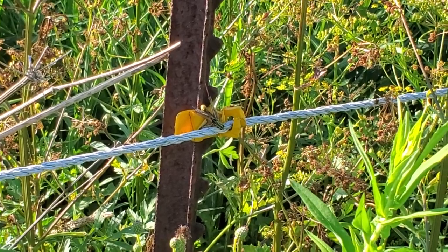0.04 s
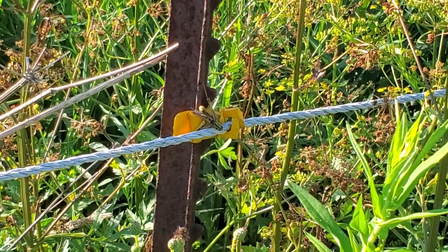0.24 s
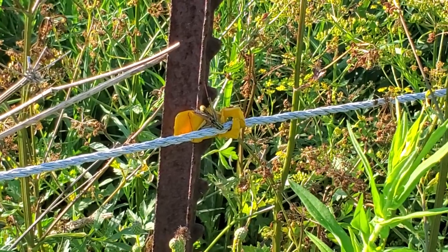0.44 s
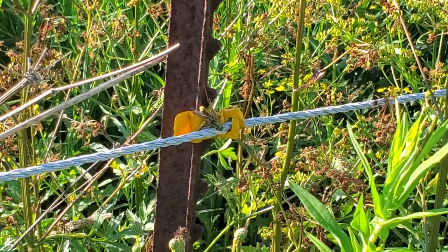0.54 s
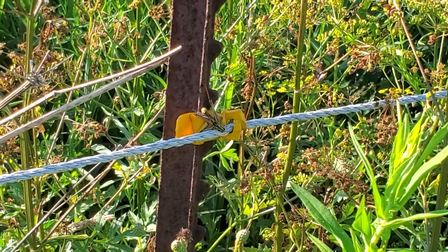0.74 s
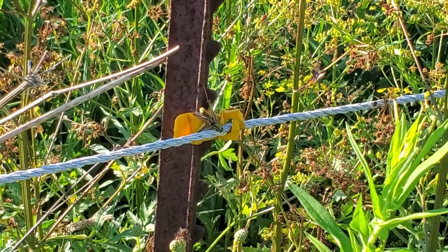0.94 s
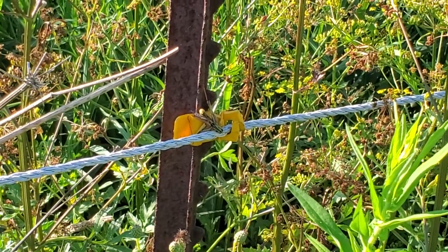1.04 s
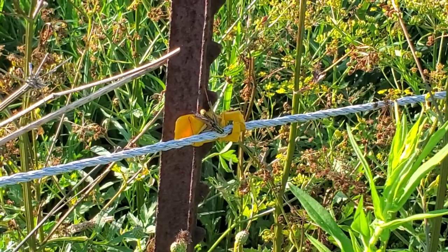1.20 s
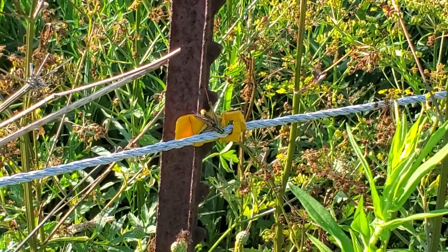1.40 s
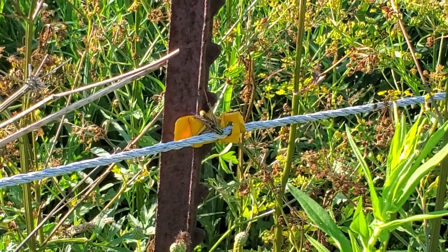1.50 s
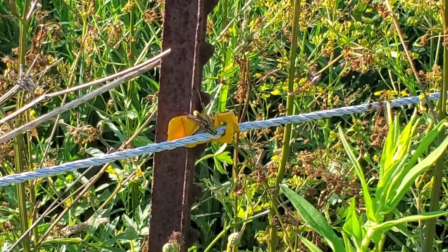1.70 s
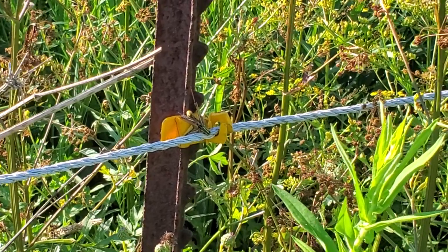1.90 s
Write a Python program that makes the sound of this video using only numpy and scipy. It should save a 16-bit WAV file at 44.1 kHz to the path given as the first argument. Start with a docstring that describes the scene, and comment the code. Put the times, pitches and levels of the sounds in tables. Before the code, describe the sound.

Two sharp electric fence clicks sound about a second apart outdoors. Faint bird chirps come first, then two short, ticking insect buzzes beside the right microphone just before the second click. A light gust stirs the grass at the end.

```python
"""A distant wash, hissing grass and light wind on the microphones sound throughout. A small bird chirps
and twitters, and a farther one whistles. Among the first notes an electric fence arcs to a steel post:
a hard snap, then a short scatter from tall weeds. An insect buzzes twice beside the right microphone,
its wings ticking against something. As the second buzz ends the fence arcs again; last, a few puffs
strike the left microphone and the grass swells in a gust."""
import sys
import numpy as np
from scipy import signal
from scipy.fft import rfft, irfft
from scipy.io import wavfile

SR = 44100
rng = np.random.default_rng(int(sys.argv[2]) if len(sys.argv) > 2 else 0)


def wav_out(sig):
    """Save sig, one row per channel (or a flat mono array), as 16-bit PCM at SR to the path in sys.argv[1]."""
    wavfile.write(sys.argv[1], SR, np.round(np.clip(np.atleast_2d(sig).T, -1, 1) * 32767).astype(np.int16))


N = 85995
T = np.arange(N) / SR
AIR_TOP_HZ, CUTOFF_HZ = 15900, 17100


def from_db(db):
    """Amplitude ratio: tenfold for every 20 dB."""
    return 10 ** (np.asarray(db) / 20)


def rms_one(x):
    """Normalisation to a root mean square of 1."""
    return x / np.sqrt(np.mean(x ** 2) + 1e-20)


def in_time(rows):
    """Linear interpolation at every sample of rows that begin with a time in seconds."""
    s, *columns = np.transpose(rows)
    return [np.interp(T, s, c) for c in columns]


def pan(db):
    """Constant-power panning: two gains, the left db above the right."""
    return rms_one(from_db([[db / 2], [-db / 2]]))


def drift(hz):
    """Random fluctuation of rms 1: noise through a two-pole low-pass."""
    r = np.exp(-2 * np.pi * hz / SR)
    return rms_one(signal.lfilter([1], [1, -2 * r, r * r], rng.standard_normal(2 * N))[N:])


def gains(spectrum, hz):
    """Magnitude response through (Hz, dB) points, falling 12 dB an octave beyond its ends."""
    f, db = np.transpose(spectrum)
    hz = np.maximum(hz, 1)
    skirts = np.minimum(1, np.minimum(hz / f[0], f[-1] / hz)) ** 2
    return from_db(np.interp(np.log(hz), np.log(f), db)) * skirts


def noise(spectrum, correlation=0, top_hz=AIR_TOP_HZ):
    """Coloured stereo noise of rms 1; a shared part correlates the channels."""
    hz = np.arange(N + 1) * SR / (2 * N)
    left, right, shared = rng.standard_normal((3, 2 * N))
    white = np.sqrt(1 - correlation) * np.array([left, right]) + np.sqrt(correlation) * shared
    return rms_one(irfft(rfft(white) * gains(spectrum, hz) * (hz < top_hz))[:, :N])


def decay(start, t60):
    """Exponential decay from start, by 60 dB in t60 seconds."""
    return (T >= start) * from_db(-60 * np.clip((T - start) / t60, 0, 10))


def bumps(rows):
    """A sum of Gaussian envelopes."""
    return sum(from_db(db) * np.exp(-np.minimum(((T - s) / width) ** 2, 50)) for s, width, db in rows)


def phase_of(hz):
    """Phase in radians, the integral of frequency."""
    return 2 * np.pi * np.cumsum(hz) / SR


def distant_wash():
    """Stationary noise from far off, with little treble."""
    # Each row: frequency in Hz, level in dB.
    spectrum = [(120, -5), (190, -6.5), (280, -4.5), (400, -8), (620, -4), (1050, -4.5), (1290, -13.5),
                (1700, -15), (2170, -32), (3000, -29.5)]
    return from_db(-66.5) * pan(-3) * noise(spectrum, correlation=.5)


def grass():
    """A broadband hiss that slowly rises, dips after the second snap, then swells in a closing gust."""
    # Each row: frequency in Hz, level in dB.
    hiss_spectrum = [(1500, 3), (2600, -8), (4000, -1.5), (5200, -7), (6700, 3), (8000, -13.5), (9600, -9),
                     (12000, 0.5), (15500, -8)]
    gust_spectrum = [(800, 2.5), (1500, -2.5), (2700, 1.5), (4500, -2), (6700, 1.5), (8100, -13.5),
                     (9600, -8.5), (12500, -3), (15500, -1.5)]
    # Each row: time in seconds, level in dB.
    hiss_level = [(0, -74), (.3, -72), (.55, -69.5), (.8, -68.5), (1.0, -67), (1.2, -67), (1.4, -67.5),
                  (1.55, -71.5), (1.95, -59)]
    gust_level = [(0, -100), (1.58, -90.5), (1.7, -67.5), (1.8, -57), (1.88, -52.5), (1.95, -53.5)]
    hiss = from_db(in_time(hiss_level)[0] + .7 * drift(40)) * noise(hiss_spectrum, correlation=.15)
    gust = from_db(in_time(gust_level)[0] + .8 * drift(51)) * noise(gust_spectrum, correlation=.15)
    return pan(-3.5) * hiss + pan(-4.5) * gust


def microphone_wind():
    """Turbulent pressure on the microphones: a rumble, and low puffs on the left."""
    # Each row: frequency in Hz, level in dB.
    spectrum = [(20, -23.5), (40, -9), (65, 2), (95, -1), (140, -21.5), (250, -28)]
    # Each row: time in seconds, level in dB.
    level = [(0, -71), (.2, -76), (.4, -68), (1.1, -65), (1.4, -69.5), (1.95, -60.5)]
    # Each row: centre in seconds, half-width in seconds, level in dB.
    puffs = [(1.51, .015, -55), (1.632, 0.012, -52), (1.67, 0.012, -43)]
    rumble = from_db(in_time(level)[0] + drift(6)) * noise(spectrum, correlation=.4)
    eddy_hz = 58 * (1 + .14 * drift(60))
    return rumble + pan(20) * bumps(puffs) * np.sin(phase_of(eddy_hz))


def birds():
    """Frequency-modulated tones: rising chirps, thin twitters and a farther bird's falling whistle."""
    # Each row: start and length in seconds, first and last pitch in Hz, level in dB.
    chirps = [(.010, 0.068, 3930, 4970, -54), (0.219, 0.061, 4190, 4870, -54),
              (0.426, .066, 4087, 4830, -54), (0.644, 0.059, 3853, 4730, -57)]
    # Each row: start and length in seconds, first, middle and last pitch in Hz, level in dB.
    twitters = [(0.122, 0.0067, 4850, 5400, 6650, -63), (0.131, 0.0063, 6700, 5900, 5030, -62),
                (0.141, 0.011, 6600, 5500, 4500, -54.5), (0.332, 0.0066, 7300, 6300, 5240, -65.5),
                (.339, 0.0062, 7100, 5950, 4950, -61.5), (0.346, 0.006, 6700, 5550, 4430, -57.5),
                (0.353, .008, 6090, 5100, 4100, -56.5), (0.366, .019, 4200, 5970, 6270, -62),
                (0.382, .011, 6500, 5460, 2630, -57.5), (0.547, 0.01, 4900, 5760, 6960, -64.5),
                (.556, 0.0067, 6840, 5560, 4600, -62), (0.564, 0.0063, 6320, 5400, 4560, -61.5),
                (0.576, 0.014, 5360, 4590, 4200, -59.5), (0.589, 0.02, 4550, 6040, 3860, -64.5)]
    whistles = [(.168, .095, 3150, 2780, 2520, -67), (.265, .065, 2550, 2455, 2400, -75)]
    rasp_depth_hz, rasp_rate_hz, waver_hz = 250, 300, 58.5
    song = np.zeros(N)
    for start, length, first_hz, last_hz, db in chirps:
        u = np.clip((T - start) / length, 0, 1)
        rasp = rasp_depth_hz * np.sin(2 * np.pi * rasp_rate_hz * T) + waver_hz * drift(300)
        hz = first_hz + (last_hz - first_hz) * u ** 2 + (1 - u ** 2) * rasp  # starts raspy, ends pure
        swell = np.minimum(2 * u, 1) * np.minimum((1 - u) / .15, 1)
        song += from_db(db) * swell * np.sin(phase_of(hz))
    for start, length, *pitches, db in twitters + whistles:
        u = np.clip((T - start) / length, 0, 1)
        arch_hz = np.polyval(np.polyfit([0, .5, 1], pitches, 2), u)
        hz = arch_hz * (1 + .068 * drift(500))
        swell = np.sqrt(np.abs(np.sin(np.pi * u)))
        song += from_db(db) * swell * np.sin(phase_of(hz))
    leaves = from_db(-2.5) * echoes(song, t60=.032)
    field = from_db(-8.5) * echoes(song, t60=.69)
    return pan(-10.5) * (song + leaves + field)


def echoes(x, t60):
    """Diffuse reflection: convolution with decaying noise of unit energy, different in each ear."""
    response = rms_one(rng.standard_normal((2, N)) * decay(0, t60)) / np.sqrt(N)
    return signal.fftconvolve(response, x[None], axes=1)[:, :N]


def causal_pulse(spectrum, size=2048):
    """Minimum phase: folding the cepstrum gives the most compact one-sided pulse of a spectrum."""
    cepstrum = irfft(np.log(gains(spectrum, np.linspace(0, SR / 2, size + 1)) + 1e-3))
    cepstrum[1:size] *= 2
    cepstrum[size + 1:] = 0
    return irfft(np.exp(rfft(cepstrum)))


def snap(start, db, treble_db, treble_hz):
    """An arc's pressure pulse arrives directly, then as a duller near reflection."""
    # Each row: frequency in Hz, left and right level in dB.
    spectrum = [(300, -28.5, -28.5), (700, -21, -24), (1150, -13, -9.5), (2160, -11.5, -19), (3470, -1, -1),
                (4725, 10, 9.5), (7010, 10, 21), (7480, 3, 12.5), (9200, -8.5, -2), (12250, -4.5, -2.5),
                (15800, -3, 6.5)]
    hz, *ears = np.transpose(spectrum)
    right_lag_s, smear_hz, smear_width_hz = .00006, 5870, 5600
    r = np.exp(-np.pi * smear_width_hz / SR)
    poles = np.array([1, -2 * r * np.cos(2 * np.pi * smear_hz / SR), r * r])
    out = np.zeros((2, N))
    for ear, colour in enumerate(ears):
        echo_s = .002 * rng.uniform(.82, 1.05)
        for delay, path_db, path_treble_db in ((0, 0, 0), (echo_s, -12, -9)):
            levels = colour + db + path_db + (treble_db + path_treble_db) * (hz > treble_hz)
            pulse = causal_pulse(np.transpose([hz, levels]))
            pulse = signal.lfilter(poles[::-1], poles, pulse)  # all-pass dispersion
            i = int((start + delay) * SR) + ear * round(right_lag_s * SR)
            out[ear, i:i + len(pulse)] += pulse
    return out


def fence_arcs():
    """Impulse response: each snap scatters off the weeds and leaves a brief high ring and a far tail."""
    # Each row: start in seconds, snap level, treble boost and scatter level in dB,
    # scatter T60 in seconds, tail level in dB.
    arcs = [(0.1504, 0.5, -3.5, -26, 0.047, -53.5), (1.3166, -3.5, 1.5, -28, 0.07, -49.5)]
    # Each row: frequency in Hz, level in dB.
    weed_spectrum = [(400, -47), (1000, -13.5), (1750, -15.5), (2300, -10.5), (3400, -2.5), (5000, -3.5),
                     (6700, 4.5), (8200, -4), (10000, -0.5), (15500, -2.5)]
    tail_spectrum = [(800, -6.5), (2000, -7), (3500, 2), (6700, 3), (8200, -3.5), (12000, -3.5),
                     (15500, -6)]
    # Each row: frequency in Hz, level in dB, T60 in seconds.
    ring_modes = [(4930, -44, .07), (6580, -41.5, .07), (8860, -50.5, 0.025), (11700, -43, .07),
                  (13100, -73.5, .07)]
    treble_hz, scatter_rise_s = 8500, .00089
    out = np.zeros((2, N))
    for start, db, treble_db, scatter_db, scatter_t60, tail_db in arcs:
        age = T - start
        out += snap(start, db, treble_db, treble_hz)
        colour = [(hz, level + treble_db * (hz > treble_hz)) for hz, level in weed_spectrum]
        envelope = decay(start, scatter_t60) * np.clip(age / scatter_rise_s, 0, 1)
        scatter = from_db(scatter_db) * envelope * noise(colour, correlation=.22)
        ring = sum(from_db(level) * decay(start, t60) * np.sin(2 * np.pi * hz * age)
                   for hz, level, t60 in ring_modes)
        tail = from_db(tail_db) * decay(start, t60=.3) * noise(tail_spectrum)
        out += pan(-2) * (scatter + ring) + pan(-2.5) * tail
    return out


def insect():
    """Periodic wingbeats radiate harmonics, stir the air and rasp; the wings tick where they touch."""
    # One list a buzz. Each row: time in seconds, wingbeat rate in Hz, level in dB.
    buzzes = [
        [(.915, 143, -84), (.945, 146, -52), (.968, 141, -47), (1.022, 145, -52), (1.066, 140, -45),
         (1.108, 137, -49), (1.128, 136, -65.5)],
        [(1.262, 142, -72), (1.287, 142, -48), (1.303, 146, -50.5), (1.322, 147, -67.5)],
    ]
    # Each entry: a harmonic's level in dB, from the fundamental up.
    harmonics = [0, -6, -19, -13, -17, -20, -24, -25]
    # Each row: frequency in Hz, level in dB.
    rasp_spectrum = [(500, -9.5), (2000, -26), (4200, -22), (5500, -7.5), (6800, 7), (8500, -8),
                     (11000, 0.5), (14500, 1), (16500, -8.5)]
    draught_spectrum = [(110, -5), (220, 1.5), (400, -2), (700, -5.5), (1200, -16), (2500, -16),
                        (4500, -18), (8000, -31)]
    # Each row: start in seconds, level in dB, decay time in seconds.
    ticks = [(0.932, -47, 0.0012), (1.057, -51.5, 0.0016), (1.0638, -38, .0014), (1.0675, -31, .001),
             (1.072, -31, 0.0024), (1.076, -46, .0008), (1.096, -41, 0.002), (1.1022, -47, 0.00055),
             (1.1038, -40, 0.00084), (1.1118, -36.5, 0.0011), (1.2682, -51.5, .003), (1.2763, -47, 0.0017),
             (1.2776, -38, 0.0014), (1.2783, -44, 0.001), (1.2851, -36, 0.0015), (1.2869, -47, 0.00092)]
    # The wings brush past. Each row: centre in seconds, half-width in seconds, level in dB.
    stirs = [(1.068, 0.0056, -58.5), (1.103, 0.02, -51.5), (1.289, 0.02, -62)]
    jitter, flutter_db = .024, 1.2
    rasp = noise(rasp_spectrum, top_hz=CUTOFF_HZ)[0]
    draught = noise(draught_spectrum)[0]
    wings = bumps(stirs) * draught
    for buzz in buzzes:
        hz, db = in_time(buzz)
        level = from_db(db) * (T > buzz[0][0]) * (T < buzz[-1][0])
        phase = phase_of(hz * (1 + jitter * drift(58.2)))
        tone = sum(from_db(harmonic_db + flutter_db * drift(28) * (k > 0)) * np.cos((k + 1) * phase)
                   for k, harmonic_db in enumerate(harmonics))
        strokes = from_db(-18.5 + 2 * drift(40)) * rms_one(np.exp(np.cos(phase)))  # one swell a beat
        wings += level * (from_db(-17.5) * draught + strokes * rasp - rms_one(tone))
    for start, db, width in ticks:
        wings += rasp * (T >= start) * bumps([(start, width, db)])
    return pan(-31.5) * wings


def scene():
    """Superposition of the sources around the fence post."""
    return fence_arcs() + insect() + birds() + distant_wash() + grass() + microphone_wind()


def record(dry):
    """Band limiting by a steep low-pass, then clipping at full scale."""
    low_pass = signal.cheby2(14, 60, CUTOFF_HZ, fs=SR, output="sos")
    return np.clip(signal.sosfilt(low_pass, dry), -1, 1)


dry = scene()
out = record(dry)
wav_out(out)
```